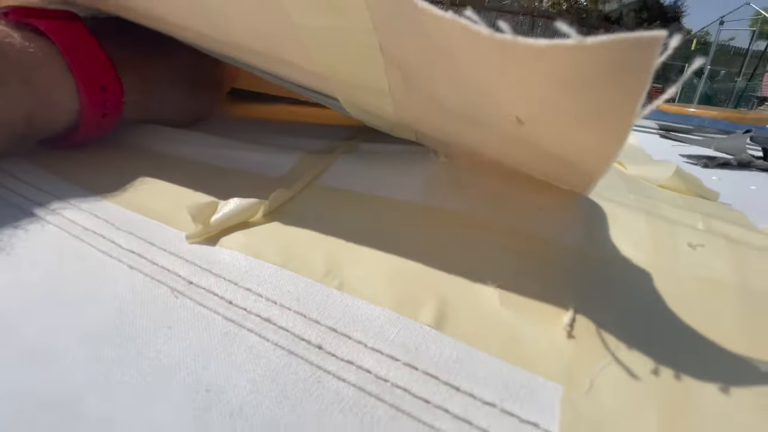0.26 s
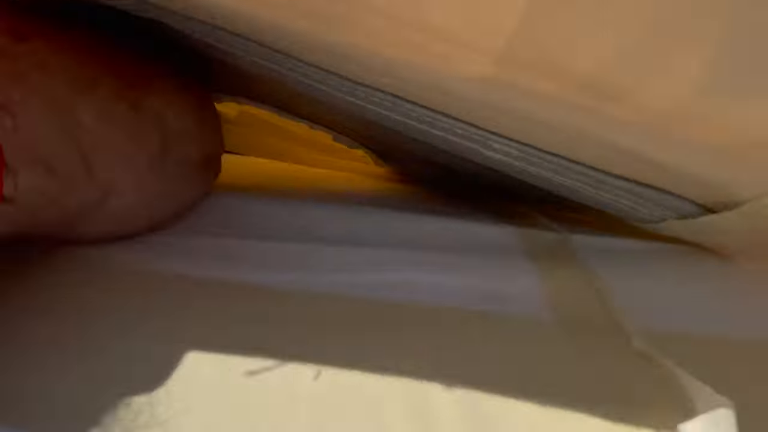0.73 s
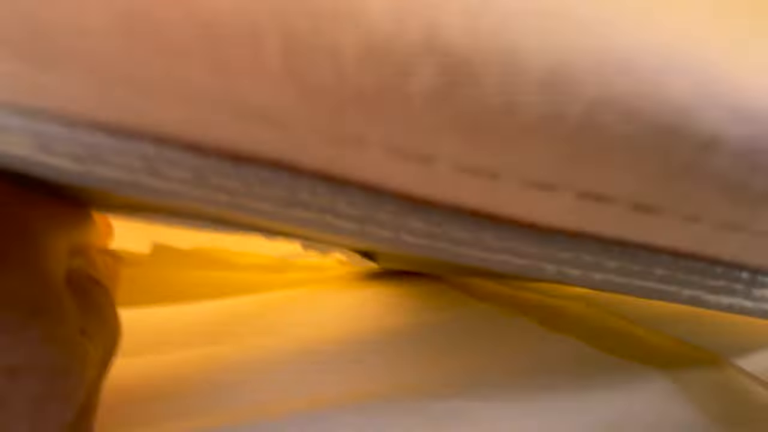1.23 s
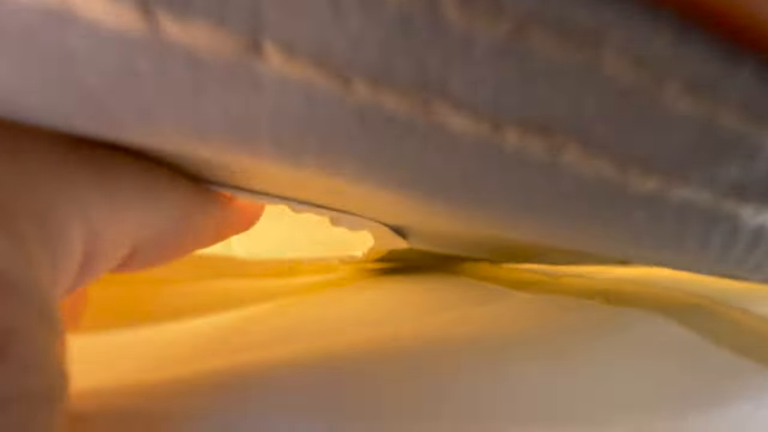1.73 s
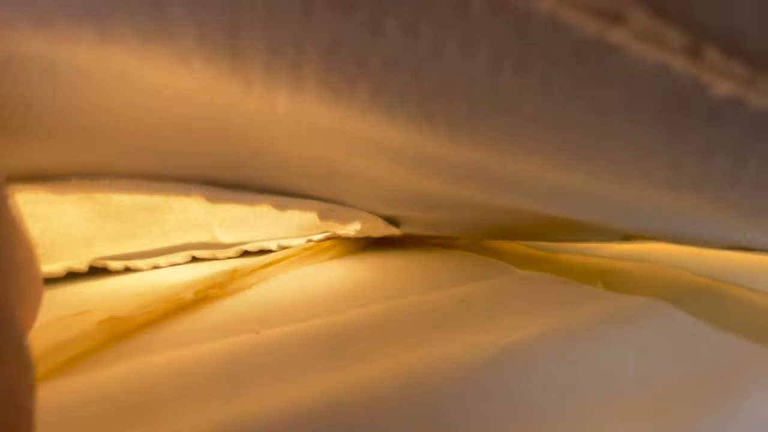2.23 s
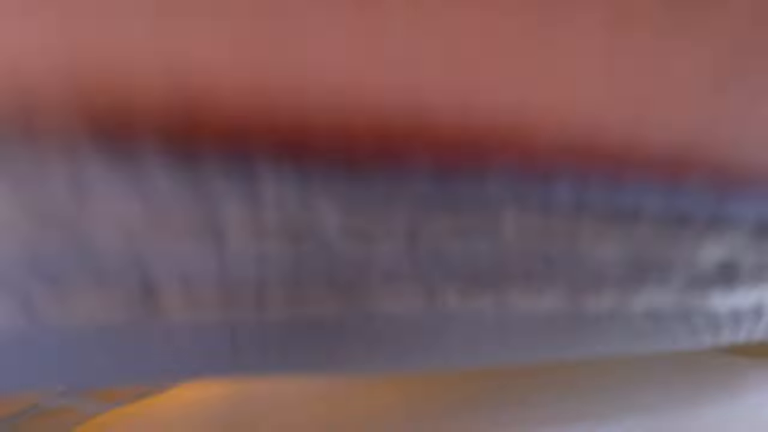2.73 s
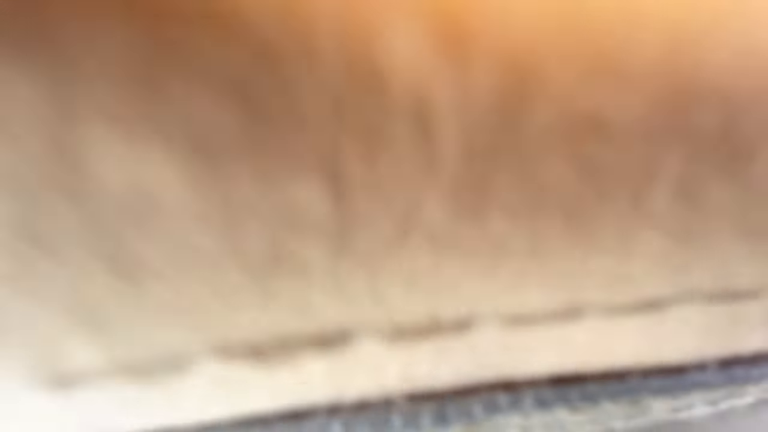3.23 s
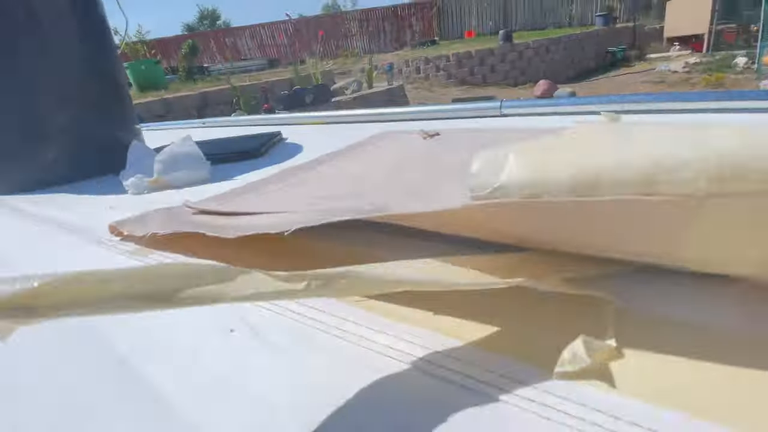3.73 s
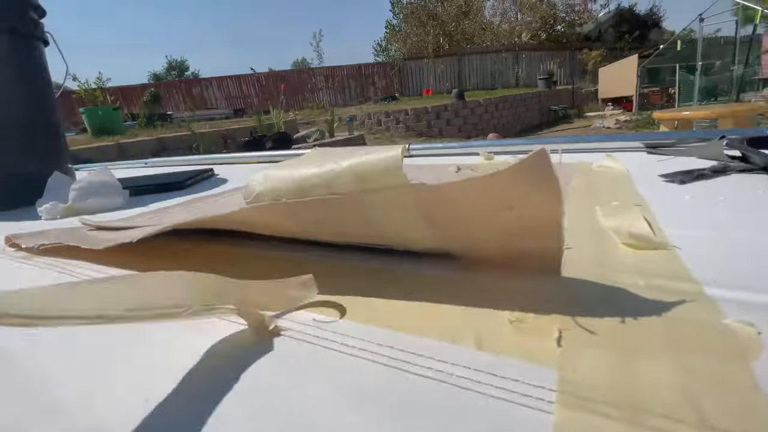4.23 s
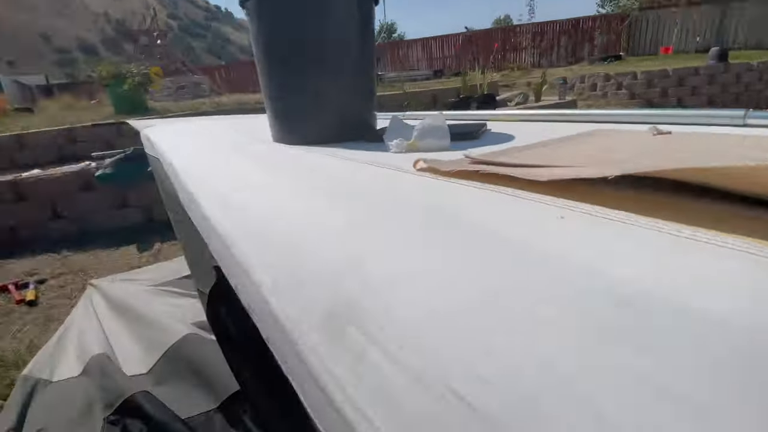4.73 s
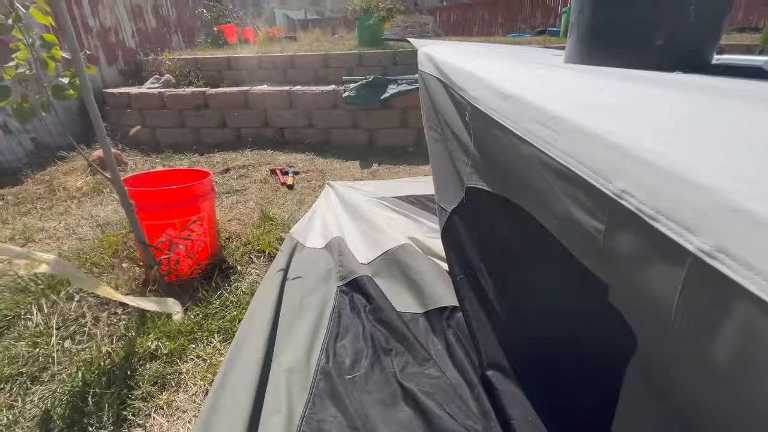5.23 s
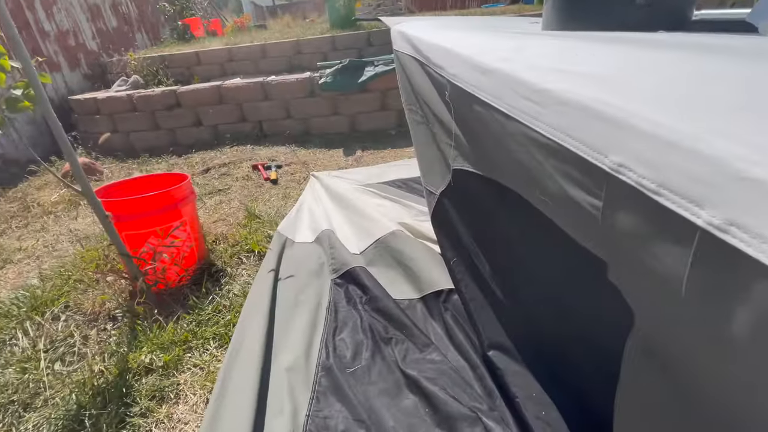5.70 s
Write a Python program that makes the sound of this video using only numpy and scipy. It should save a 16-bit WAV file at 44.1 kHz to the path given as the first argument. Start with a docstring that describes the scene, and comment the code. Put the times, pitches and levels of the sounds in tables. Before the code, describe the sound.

Outdoors, a hand works under stiff paper on canvas, giving small ticks, then sharp cracks with deep, falling pops. The canvas presses on the handheld microphone, growing into a loud, juddering scrape and low handling rumble around three seconds. After it cuts away, a strip of tape tears loose with fizzing crackle and bright snaps, then barely rustles above soft air and a nearby machine's unsteady hum.

```python
"""A sheet of masking paper taped to canvas buckles and snaps as a hand works under it, close to a camera.
The canvas slides over the microphone: shaped noise makes its rumble, scrape and hiss.
Short noise bursts make the snaps, and tones falling in pitch make the buckles.
Then a strip of tape rips free and flutters: runs of tiny bursts ring its resonances.
Outdoors, a distant engine drones on four drifting tones, mostly sinking; air noise and a machine's hum lie below."""
import sys
import numpy as np
from scipy import signal
from scipy.fft import rfft, irfft, next_fast_len
from scipy.io import wavfile

SR = 44100
rng = np.random.default_rng(int(sys.argv[2]) if len(sys.argv) > 2 else 0)


def wav_record(signal):
    """Record a signal, one row per channel, as 16-bit PCM in the file named by sys.argv[1]."""
    frames = np.transpose(np.atleast_2d(signal))
    bounded = np.clip(frames, -1, 1)
    # unit amplitude maps onto the largest positive 16-bit level
    quanta = np.round(bounded * 32767).astype(np.int16)
    wavfile.write(sys.argv[1], SR, quanta)


N = 262836
TIME = np.arange(N) / SR
FFT_SIZE = next_fast_len(N, real=True)
HZ = np.fft.rfftfreq(FFT_SIZE, 1 / SR)

# All levels in the tables are relative: each sound is balanced again where it is mixed.
# Low rumble of the camera being moved about: time_s, level_db
HANDLING_LEVEL = [(0, -34.5), (.48, -33), (.8, -27), (1.15, -26.5), (2.05, -25.5), (2.17, -34), (2.27, -25),
                  (2.45, -25), (2.85, -18), (3.3, -16.5), (3.43, -25), (3.5, -29.5), (3.63, -32.5),
                  (3.73, -63.5)]
# How hard the canvas presses on the camera, as scrape level: time_s, level_db
CANVAS_PRESSURE = [(0, -40.5), (.3, -42), (.55, -36), (.9, -37.5), (1.15, -32), (1.28, -34.5), (1.8, -34.5),
                   (2.075, -30), (2.12, -35.5), (2.19, -45), (2.26, -32.5), (2.7, -31), (3.11, -29),
                   (3.27, -25.5), (3.36, -25.5), (3.45, -28.5), (3.5, -40.5), (3.65, -34.5), (3.72, -42),
                   (3.79, -61.5)]
# Noise colours of the sliding cloth, each: pitch_hz, level_db
RUMBLE_COLOUR = [(15, -29.5), (35, -16.5), (62, 0.5), (100, -6), (150, -8.5), (220, -20.5), (400, -25),
                 (900, -52.5)]
SCRAPE_COLOUR = [(100, -33), (250, 6.5), (450, -2), (700, 2.5), (900, -6.5), (1200, -11), (1500, -36.5),
                 (2400, -29), (5000, -36.5)]
RASP_COLOUR = [(200, -26), (450, -3), (700, 2), (950, 9.5), (1200, 10.5), (1600, 0.5), (2100, -5),
               (3000, -5.5), (4200, -16.5), (6000, -30.5)]
HISS_COLOUR = [(700, -1), (1400, 2), (2200, -1), (3100, 4), (4100, -0.5), (5500, 0), (6800, -3),
               (9000, -3.5), (13000, -13), (15500, -11.5)]
# The cloth's balance between the ports: pitch_hz, left_minus_right_db
CLOTH_SIDE = [(150, -5), (330, -2), (650, 3), (1100, 5), (1800, 1), (5000, 2.5)]
# Strokes of paper over canvas: start_s, length_s, level_db, brightness_db_per_octave, fold_ring_hz
PAPER_STROKES = [(0.032, 0.12, -53, -4.5, 2980), (0.302, 0.12, -43.5, -2, 2900),
                 (0.422, 0.54, -48.5, -2.5, 2930), (0.637, 0.13, -48.5, 2, 5500),
                 (0.982, 0.079, -40, -2, 2660), (1.124, 0.066, -33.5, 0.5, 5400),
                 (1.339, 0.017, -34.5, -2, 4900), (1.471, 0.011, -41.5, -4, 4500),
                 (1.513, 0.32, -43.5, 2, 5850), (2.012, 0.12, -38, 0, 2300), (2.201, 0.18, -44, 1.5, 5960),
                 (2.397, 0.24, -35.5, -1, 5470), (2.57, 0.66, -35, -.5, 4040),
                 (3.087, 0.084, -42, -4.5, 4500), (3.154, 0.31, -27, 2, 6550),
                 (3.465, 0.21, -37, 1.5, 5400)]
# The weave catching hard on the camera: start_s, level_db, ring_hz
WEAVE_CATCHES = [(2.424, -18.5, 638), (2.806, -12.5, 923), (2.864, -18.5, 694), (2.896, -18.5, 548),
                 (2.928, -13.5, 468), (2.947, -14, 666), (3.01, -19.5, 620), (3.067, -12, 460),
                 (3.103, -19, 708), (3.154, -15, 980), (3.174, -20, 744), (3.21, -15.5, 730),
                 (3.243, -12, 660), (3.272, -10.5, 680), (3.298, -7.5, 626), (3.314, -11.5, 1260),
                 (3.355, -13.5, 950), (3.394, -12.5, 767), (3.465, -17.5, 940)]
# Creases and glue letting go: start_s, level_db, ring_hz, brightness_db_per_octave
SNAP_EVENTS = [(0.1418, -20.5, 3330, -2.5), (0.1809, -23, 3130, -3), (0.225, -23, 3870, -2.5),
               (0.3006, -18.5, 4200, 2), (0.5297, -16.5, 2040, -4), (0.552, -15.5, 2100, -7.5),
               (0.939, -18.5, 4580, -2.5), (1.1318, -17.5, 1330, 13), (1.164, -19, 1400, 4),
               (1.3443, -13.5, 4860, -5.5), (1.384, -20.5, 4230, -1.5), (1.4878, 3.5, 5900, 10),
               (1.521, -21, 3510, -5.5), (1.679, -20, 1490, -8.5), (1.783, -14.5, 1920, -1.5),
               (1.8, 2, 2020, -5.5), (1.8173, -6, 1580, -0.5), (1.8874, -16.5, 1330, 7),
               (1.9078, -12.5, 1510, -2), (1.949, -22.5, 1900, -2.5), (2.0025, 0, 1780, -6),
               (2.029, -6.5, 3960, -4), (2.053, -11, 2650, -2.5), (2.057, -3.5, 1040, -6),
               (2.0706, -8, 2400, -8), (2.077, -1, 2300, -8), (2.0816, -4.5, 1990, 6),
               (2.0858, -6.5, 2400, -3), (2.11, -15.5, 1920, -4), (2.146, -19, 1580, -6.5),
               (2.183, -32.5, 4800, 0.5), (2.7318, -12.5, 1600, -9), (2.966, -13.5, 1337, -1.5),
               (3.468, -9.5, 5270, -4.5), (3.5933, -11.5, 5400, -2.5), (3.8621, -15.5, 1295, 1),
               (3.882, -15.5, 5550, 2), (4.0168, -16.5, 1310, 0), (4.0932, -11.5, 6300, 1),
               (4.113, -13.5, 6050, 0.5), (4.126, -6.5, 6040, 21), (4.148, -16, 1376, 0.5),
               (4.1645, -15.5, 1620, 0.5), (4.2352, -27, 3900, -2), (4.3106, -29.5, 2280, -2.5),
               (4.805, -30.5, 1840, -0.5), (4.929, -21.5, 5270, 2.5), (4.949, -33, 5300, 0),
               (4.958, -32.5, 2270, -5), (5.204, -38, 5350, -4), (5.385, -28, 5420, 0),
               (5.394, -30, 5200, 2), (5.55, -38, 5760, 6)]
# Noise colour of creasing paper: pitch_hz, level_db
CREASE_COLOUR = [(200, -18.5), (700, -0.5), (1300, -1), (2600, -3.5), (4000, 0), (6000, -2.5), (9000, -1.5),
                 (13000, -14), (15500, -6)]
# The sheet popping over: start_s, level_db, peak_hz (pitch when loudest),
# swell_cycles (rise time, in cycles of peak_hz), fall_ratio (first pitch over last), left_minus_right_db
BUCKLE_EVENTS = [(.939, -17.5, 345, 1.4, 6.3, 3.5), (.999, -17, 74.5, 1.47, 3.2, -2.5),
                 (1.017, -18, 169, .5, 2.6, -1), (1.102, -8.5, 124, 1.96, 4, -0.5),
                 (1.126, -14, 149, .5, 3.4, 0), (1.2, -17.5, 1140, 1.9, 1.4, 8),
                 (1.22, -11, 109, 0.75, 2.3, 3.5), (1.4865, -19.5, 780, 1.1, 2, 5),
                 (1.493, -10, 58.3, 1.17, 5.7, 0), (1.628, -13.5, 84, 1.47, 6, 4.5),
                 (1.668, -14.5, 61, 0.84, 3, 0), (1.677, -23.5, 643, 1.15, 6.8, 4),
                 (1.7996, -13.5, 1566, 3.2, 5.93, 1.5), (1.909, -21, 500, 2.05, 5.1, 1),
                 (1.948, -22.5, 935, 1.5, 1.8, 5), (2.002, -17, 1490, 3.68, 7, -3),
                 (2.005, -22, 617, 2, 6, 10), (2.011, -18, 64, 1.6, 3.7, 2.5),
                 (2.077, -14, 860, 4.59, 5.3, 3), (2.0843, -10.5, 365, 1.63, 7.5, -4),
                 (2.088, -5.5, 89, 0.8, 10.4, 0.5), (2.636, -10, 80, 1, 5.3, -0.5),
                 (2.658, -14.5, 171, 3.06, 5.1, -2), (2.903, -13.5, 66.4, 1.43, 3.3, 1),
                 (3.066, -10, 170, 0.61, 8.3, -1), (3.421, -18, 227, 2.6, 2.7, 3.5)]
# The pull on the tape, as crackle level: time_s, level_db
PEEL_LEVEL = [(3.815, -49.5), (3.825, -42.5), (3.96, -41.5), (4.02, -34.5), (4.08, -35.5), (4.168, -26),
              (4.2, -50.5)]
# Swings of the dangling strip: start_s, length_s, level_db
STRIP_SWINGS = [(4.206, 0.12, -53), (4.33, 0.11, -57), (4.47, 0.051, -56.5), (4.6, 0.37, -62.5),
                (4.891, 0.13, -55.5), (5.018, 0.21, -60.5), (5.339, 0.061, -46), (5.495, 0.029, -49),
                (5.637, 0.15, -58), (5.893, 0.075, -60.5)]
# Noise colours of the tape while it rips and once it hangs loose, each: pitch_hz, level_db
TAPE_COLOUR = [(300, -24), (800, -21), (1150, -2.5), (1700, -9.5), (2700, -4.5), (4200, -10.5),
               (6500, -5.5), (9000, -7), (13000, -20), (15500, -11.5)]
LOOSE_STRIP_COLOUR = [(500, 10.5), (1500, -11), (2500, 6), (3300, 1), (4400, 0.5), (5500, -1), (8000, 0.5),
                      (11000, -20), (15500, -13)]
# Resonances of the strip: pitch_hz, width_hz, lift_db
STRIP_RESONANCES = [(1180, 110, 4), (1620, 90, 5), (4420, 130, 0.5), (5220, 120, 4.5), (5550, 140, 4),
                    (6730, 160, 1)]
# The taut strip's balance between the ports: pitch_hz, left_minus_right_db
TAUT_STRIP_SIDE = [(700, 2), (950, 9), (1400, 10.5), (2000, -2.5)]
# Loudness of the distant engine: time_s, level_db
ENGINE_LEVEL = [(0, -42.5), (1, -35), (1.8, -36.5), (2.2, -44), (3.2, -59), (3.8, -58.5), (5.9, -60)]
# Tones of the distant engine: first_hz, resting_hz, level_db, phase_wobble_rad
ENGINE_TONES = [(60.5, 65, -6.5, 0.97), (294, 250, 0, 1.4), (355, 331, -2.5, 0.93), (703, 662, -11, 2)]
# Loudness of the open air, then of the machine nearby, each: time_s, level_db
AIR_LEVEL = [(0, -48), (3.8, -50.5), (4.5, -49), (5.97, -52)]
MACHINE_LEVEL = [(3.65, -44), (3.85, -65), (4.3, -56), (4.62, -47), (5.95, -46.5)]
# Tones of the machine's hum: pitch_hz, level_db
MACHINE_TONES = [(60, -3.5), (97, -1), (280, -11.5), (657, -27)]
# Noise colours of the open air and of the machine's exhaust, each: pitch_hz, level_db
AIR_COLOUR = [(20, -26), (55, -1), (130, -0.5), (190, -15), (280, -5), (420, -18.5), (750, -13),
              (1200, -18), (1600, -24.5), (2600, -27), (3400, -33), (4400, -41), (5500, -36), (7200, -45.5),
              (9000, -49.5), (15500, -68)]
EXHAUST_COLOUR = [(30, -35), (60, -28), (75, -20), (98, -0.5), (120, -11), (170, -16), (400, -56.5)]
# How far the left microphone port leads the right: pitch_hz, lead_rad
PORT_LEAD = [(100, 0.06), (500, -.2), (1100, -.8), (1900, 0.4), (3100, 2.56), (4400, 1.8), (5300, 1),
             (6300, 1.65), (7400, 3), (9200, 4.1), (10600, 5.86), (12000, 6.21), (13400, 9.1),
             (15800, 9.87)]
# How alike the two ports are, from 0 (unrelated) to 1 (same): pitch_hz, likeness
PORT_LIKENESS = [(60, 0.99), (130, 0.98), (290, 0.81), (640, 0.15), (1400, 0.095), (3100, 0.83),
                 (4500, 0.58), (6000, 0.87), (7400, 1), (9500, 0.58), (11300, 1), (12800, 0.59), (14200, 1),
                 (16000, .55)]

# Typical pitch of the air pocket between cloth and camera
POCKET_HZ = 701
# A stroke rises over a share of its length; a little hiss follows the pressure all along
STROKE_ATTACK_SHARE, STROKE_RELEASE_S, RESTING_HISS_DB = 0.21, 0.016, -12
# A crease ringing at CRACK_REF_HZ peaks after CRACK_S; higher ones crack faster by this power
CRACK_S, CRACK_REF_HZ, CRACK_POWER = .00065, 2504, 0.33
# How long the paper shivers after a crack
SHIVER_S = .007
# How long a pop takes to fall in pitch, in swell times
BEND_GLIDE = .8
# The right port's head start on a pop grows with pitch up to here
LEAD_FULL_HZ = 217
# Glue threads: how many part in a second, unevenness of the gaps, spread of sizes
THREADS_PER_S, THREAD_JITTER, THREAD_SPREAD_DB = 520, 0.49, 2
# Time constant of the engine's drift to its resting pitch
DRONE_SETTLE_S = 2.4
# Slow fading of each engine tone: strength before levelling, and upper rate
FADING_DB, FADING_PER_S = 4.5, 2.3
# Peak limit of the input, and top of its band
HEADROOM, EDGE_HZ = .95, 16000


def amp(db):
    """Turns decibels into gain."""
    return 10 ** (np.asarray(db) / 20)


def unit(x):
    """Scales a signal to an average (rms) size of 1."""
    return x / np.sqrt(np.mean(x ** 2) + 1e-20)


def at_hz(points, hz):
    """Reads a table between its points, on a log-frequency axis."""
    f, value = np.transpose(points)
    return np.interp(np.log(hz + 1), np.log(f + 1), value)


def level(rows, fade=0.022):
    """Gain over time from a dB curve, fading out beyond its ends."""
    s, db = np.transpose(rows)
    outside = np.maximum(s[0] - TIME, 0) + np.maximum(TIME - s[-1], 0)
    return amp(np.interp(TIME, s, db)) * np.exp(-outside / fade)


def wander(hz, size=32768):
    """Smooth random drift of rms 1, mostly slower than the given rate."""
    s = np.linspace(0, N / SR, size)
    blur = np.exp(-(np.fft.rfftfreq(size, s[1]) / hz) ** 2)
    drift = unit(irfft(rfft(rng.standard_normal(size)) * blur))
    return np.interp(TIME, s, drift)


def filtered(x, gain):
    """Applies a gain to each frequency of a full-length signal."""
    return irfft(rfft(x, FFT_SIZE) * gain, FFT_SIZE)[..., :N]


def colour(x, spectrum):
    """Tints a signal with a colour table, at rms 1."""
    return unit(irfft(rfft(x, FFT_SIZE) * amp(at_hz(spectrum, HZ)), FFT_SIZE)[..., :N])


def noise(size=N):
    """Two unrelated channels of white noise."""
    return rng.standard_normal((2, size))


def add(mix, s, sound):
    """Mixes a sound in at time s."""
    part = mix[..., max(round(s * SR), 0):][..., :sound.shape[-1]]
    part += sound[..., :part.shape[-1]]


def hump(hz, ring_hz, octaves):
    """A resonance's shape over frequency, 1 at its top."""
    return 1 / (1 + (np.log2((hz + 1) / ring_hz) / octaves) ** 2)


def swell(s, length, attack_s, release_s):
    """Gain that rises, holds and dies away."""
    rise = np.clip((TIME - s) / attack_s, 0, 1)
    return rise * np.exp(-np.maximum(TIME - s - length, 0) / release_s)


def sided(pair, side):
    """Tips a pair of signals to the left or right, band by band."""
    return filtered(pair, amp(at_hz(side, HZ) * np.array([[.5], [-.5]])))


def ring_down(power, ring_s):
    """Lets each burst of power die away smoothly."""
    return signal.lfilter([1], [1, -np.exp(-1 / (ring_s * SR))], power)


def slips(per_s, spread_db, ring_s, smooth):
    """Stick-slip friction: noise in tiny bursts of uneven size, over a smooth share."""
    happens = rng.random(N) < per_s / SR
    sizes = amp(spread_db * np.minimum(rng.exponential(1, N), 4)) * happens
    power = ring_down(sizes ** 2, ring_s)
    return np.sqrt(smooth + (1 - smooth) * power / power.mean()) * noise()


def patchy(x, depth_db, span_s, span_hz, size=512):
    """Shifting folds favour now one band, now another, for a moment each."""
    z = signal.stft(x, nperseg=size, noverlap=3 * size // 4)[2]
    # a random map over pitch and time, blurred into soft patches
    per_hz = np.fft.fftfreq(z.shape[1], SR / size)[:, None]
    per_s = np.fft.rfftfreq(z.shape[2], size / 4 / SR)
    blur = np.exp(-(per_hz * span_hz) ** 2 - (per_s * span_s) ** 2)
    grain = np.fft.rfft2(rng.standard_normal(z.shape[1:]))
    field = unit(np.fft.irfft2(grain * blur, z.shape[1:]))
    return signal.istft(z * amp(depth_db * field), nperseg=size, noverlap=3 * size // 4)[1][:, :N]


def sliding():
    """Cloth grips and slips on the camera: rumble, grainy scrape, fibre hiss and paper ticks."""
    rumble = colour(noise(), RUMBLE_COLOUR) * level(HANDLING_LEVEL)
    force = level(CANVAS_PRESSURE)
    pressed = force / force.max()

    # a light touch slides smoothly; pressed hard, the cloth sticks and slips and rasps higher
    grains = slips(per_s=660, spread_db=-1.0, ring_s=0.0016, smooth=0.44)
    sticking = patchy(grains, depth_db=3.5, span_s=0.04, span_hz=407)
    weave = np.sqrt(pressed) * sticking + np.sqrt(1 - pressed) * noise()
    rasp = (amp(1.0) * colour(weave, RASP_COLOUR) + amp(-5.5) * plucks()) * pressed ** 2.08

    # the air between cloth and camera rings at a pitch that shifts as the folds move
    pocket_hz = POCKET_HZ * np.exp(.09 * wander(13))
    pocket = resonate(weave, pocket_hz, width_hz=127) * pressed ** 1.6
    rubbing = amp(-4.0) * colour(weave, SCRAPE_COLOUR) + rasp + amp(-6) * pocket
    scrape = sided(force * rubbing + catches(), CLOTH_SIDE)

    grit = slips(per_s=1500, spread_db=2.5, ring_s=.00025, smooth=.38)
    fibres = colour(patchy(grit, depth_db=2.5, span_s=0.048, span_hz=900), HISS_COLOUR)
    tick_bursts = slips(per_s=260, spread_db=1.5, ring_s=.0004, smooth=0)
    ticks = colour(tick_bursts, CREASE_COLOUR) * np.sqrt(pressed)
    stroke_hiss = strokes(fibres + amp(-8.5) * ticks)
    hiss = amp(0.34) * stroke_hiss + amp(RESTING_HISS_DB) * force * fibres

    # scrape and hiss judder together as the cloth grips and lets go
    judder = amp(2.1 * np.sqrt(pressed) * wander(230) - .4)
    return amp(-3.5) * rumble + judder * (amp(1.43) * scrape + hiss)


def plucks(per_s=520, low_hz=380, high_hz=1500, cycles=2.2, count=24, size=1500):
    """The camera's edge plucks threads of the weave, each ringing a few cycles at its own pitch."""
    out, t = np.zeros((2, N)), np.arange(size) / SR
    for hz in np.geomspace(low_hz, high_hz, count):
        sizes = rng.random(N) * (rng.random(N) < per_s / count / SR)
        tone = np.sin(2 * np.pi * (hz * t + rng.random((2, 1))))
        ring = tone * hz * t * np.exp(-2 * hz * t / cycles)
        out += signal.oaconvolve(sizes[None], ring, axes=1)[:, :N]
    return unit(out)


def resonate(x, hz, width_hz):
    """A resonance that follows a pitch curve, at rms 1."""
    # shift the moving pitch down to zero, smooth there, then shift back up
    turn = np.exp(2j * np.pi * np.cumsum(hz) / SR)
    r = np.exp(-np.pi * width_hz / SR)
    return unit((turn * signal.lfilter([1], [1, -2 * r, r * r], x / turn)).real)


def yard():
    """Open-air noise that swells and sinks, with the unsteady hum and low noise of a machine nearby."""
    patches = patchy(noise(), depth_db=1.5, span_s=.2, span_hz=700)
    air = colour(patches, AIR_COLOUR) * level(AIR_LEVEL) * amp(1.2 * wander(7.1))
    hum = np.zeros(N)
    for hz, db in MACHINE_TONES:
        gain = amp(db + 4.3 * wander(31))
        hum += gain * np.sin(2 * np.pi * hz * TIME + 3.35 * wander(5.8))
    exhaust = colour(noise(), EXHAUST_COLOUR)
    flicker = amp(-1.5 + 1.7 * wander(17))
    return air + amp(1.5) * (exhaust + hum) * level(MACHINE_LEVEL) * flicker


def engine():
    """Far engine tones drift to rest, mostly sinking; the air makes each fade and waver by itself."""
    out = np.zeros(N)
    for first_hz, rest_hz, db, wobble in ENGINE_TONES:
        hz = rest_hz + (first_hz - rest_hz) * np.exp(-TIME / DRONE_SETTLE_S)
        fading = unit(amp(FADING_DB * np.tanh(wander(FADING_PER_S)) + 1.8 * wander(14)))
        phase = 2 * np.pi * np.cumsum(hz) / SR + wobble * wander(9.0)
        out += amp(db) * fading * np.sin(phase)
    return out * level(ENGINE_LEVEL, fade=0.89)


def strokes(fibres, ring_db=4, ring_octaves=0.063):
    """Each stroke tints the fibre hiss with its own brightness and the ring of the fold that it rubs."""
    out = np.zeros((2, N))
    for s, length, db, bright_db, ring_hz in PAPER_STROKES:
        # leave .2 s after the stroke for it to die away
        span = slice(max(round(s * SR), 0), round((s + length + .2) * SR))
        gain = swell(s, length, STROKE_ATTACK_SHARE * length, STROKE_RELEASE_S)[span]
        size = next_fast_len(len(gain), real=True)
        hz = np.fft.rfftfreq(size, 1 / SR)
        tilt_db = bright_db * np.log2(np.maximum(hz, 2000) / 2000)
        tint = amp(tilt_db + ring_db * hump(hz, ring_hz, ring_octaves))
        tinted = unit(irfft(rfft(fibres[:, span], size) * tint, size))
        add(out, s, amp(db) * gain * tinted[:, :len(gain)])
    return out


def snaps(tail_db=-20, ring_db=8, ring_octaves=0.31, echo_s=0.0032, echo_db=-16.5, size=4096):
    """Each crease gives a sharp crack, with a ring of its own, and a short shiver of the paper."""
    out, t, hz = np.zeros((2, N)), np.arange(size) / SR, np.fft.rfftfreq(size, 1 / SR)
    for s, db, ring_hz, bright_db in SNAP_EVENTS:
        u = t / CRACK_S * (ring_hz / CRACK_REF_HZ) ** CRACK_POWER
        burst = u ** 2 * np.exp(2 - 2 * u)
        shiver = amp(tail_db) * (1 - np.exp(-u)) * np.exp(-t / SHIVER_S)
        tilt_db = bright_db * np.log2(np.clip(hz, 400, 6000) / 4000)
        tint = amp(at_hz(CREASE_COLOUR, hz) + tilt_db + ring_db * hump(hz, ring_hz, ring_octaves))
        crack = (burst + shiver) * unit(irfft(rfft(noise(size)) * tint))
        add(out, s, amp(db - 9.0) * crack)
        # the canvas throws it back, sides swapped, from a slightly different distance each time
        add(out, s + echo_s * rng.uniform(0.4, 1), amp(db + echo_db) * crack[::-1])
    return out


def buckles(ragged=0.14, right_lead=0.85):
    """A stiff sheet pops over: fast high bending waves arrive first, so each pop falls in pitch."""
    out = np.zeros((2, N))
    for s, db, peak_hz, cycles, fall, side_db in BUCKLE_EVENTS:
        swell_s = cycles / peak_hz
        # u counts swell times; the pop is loudest at u = 1
        u = np.arange(round(6 * swell_s * SR)) / (swell_s * SR)
        bend = 1 + (fall - 1) / (1 + u / BEND_GLIDE) ** 2
        hz = peak_hz * bend / np.interp(1, u, bend)
        shape = u * np.exp((1 - u ** 1.5) / 1.5)
        phase = 2 * np.pi * np.cumsum(hz) / SR
        lead = right_lead * np.minimum(hz / LEAD_FULL_HZ, 1) ** 2
        left = amp(db + side_db / 2) * np.sin(phase)
        right = amp(db - side_db / 2) * np.sin(phase + lead)
        add(out, s, shape * np.array([left, right]))
    return out * (1 + ragged * np.array([wander(930), wander(680)]))


def catches(rise_s=0.0016, ring_db=14, ring_octaves=0.49, size=2048):
    """A thread snags and lets go: a short burst with a ring of its own."""
    out, hz = np.zeros((2, N)), np.fft.rfftfreq(size, 1 / SR)
    u = np.arange(size) / SR / rise_s
    for s, db, ring_hz in WEAVE_CATCHES:
        tint = amp(ring_db * hump(hz, ring_hz, ring_octaves) - 10.4 * np.log2(1 + hz / 1500))
        burst = unit(irfft(rfft(noise(size)) * tint))
        add(out, s, amp(db - 8) * u * np.exp(1 - u) * burst)
    return out


def peeling():
    """Glue threads break in a quick run and ring the taut strip; the loose strip then rustles at each swing."""
    taut = strip(colour(threads(), TAPE_COLOUR))
    rip = sided(taut, TAUT_STRIP_SIDE) * level(PEEL_LEVEL, fade=0.099)
    grains = slips(per_s=230, spread_db=4.5, ring_s=.0015, smooth=.5)
    crinkles = patchy(grains, depth_db=3.5, span_s=.025, span_hz=400)
    rustle = strip(colour(crinkles, LOOSE_STRIP_COLOUR))
    swings = np.zeros(N)
    for s, length, db in STRIP_SWINGS:
        swings += amp(db) * swell(s, length, attack_s=0.024, release_s=0.014)
    return amp(-1.0) * (rip + rustle * swings)


def threads(ring_s=0.00046, smooth=0.3, count=8000):
    """Glue threads part one after another: uneven tiny snaps over a bed of fine fizz."""
    gaps, sizes = rng.standard_normal((count, 2)).T
    at = (np.cumsum(np.exp(THREAD_JITTER * gaps)) * SR / THREADS_PER_S).astype(int)
    snap_power = amp(THREAD_SPREAD_DB * np.clip(sizes, -2, 2)) ** 2
    power = ring_down(np.bincount(at, snap_power, N)[:N], ring_s)
    return np.sqrt(smooth + power / power.mean()) * noise()


def strip(x):
    """The narrow resonances of the strip of tape, at rms 1."""
    lift_db = sum(db / (1 + (2 * (HZ - hz) / width) ** 2) for hz, width, db in STRIP_RESONANCES)
    return unit(filtered(x, amp(lift_db)))


def ports(pair):
    """Two unrelated signals become the partly alike, phase-shifted signals of the two microphone ports."""
    a, b = rfft(pair, FFT_SIZE)
    same = np.clip(at_hz(PORT_LIKENESS, HZ), 0, 1)
    mixed = same * a + np.sqrt(1 - same ** 2) * b
    right = mixed * np.exp(-1j * at_hz(PORT_LEAD, HZ))
    return irfft(np.array([a, right]), FFT_SIZE)[:, :N]


def scene():
    """Everything as it reaches the two ports; buckles and engine set their own left and right."""
    return ports(sliding() + yard() + snaps() + peeling()) + engine() + buckles()


def record(dry):
    """The input flattens peaks beyond its headroom; then a filter removes the highest treble."""
    edge = signal.firwin(401, EDGE_HZ, window=("kaiser", 8), fs=SR)
    return signal.oaconvolve(np.clip(dry, -HEADROOM, HEADROOM), edge[None], "same")


dry = scene()
out = record(dry)
wav_record(out)
```